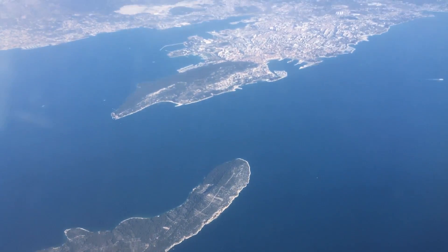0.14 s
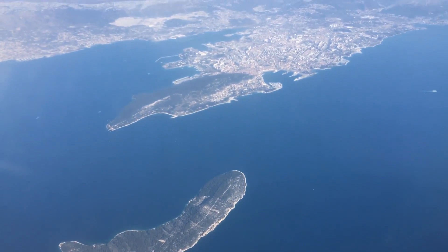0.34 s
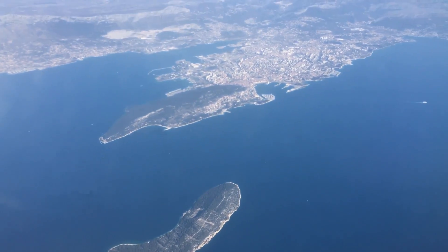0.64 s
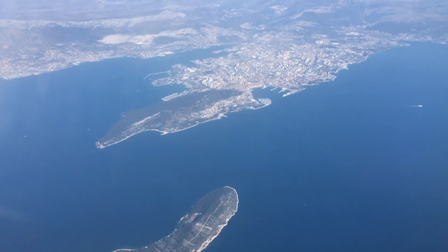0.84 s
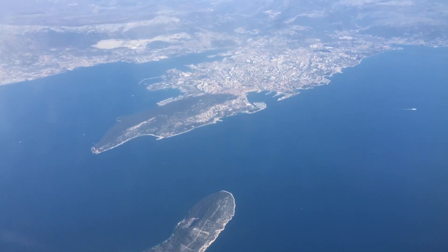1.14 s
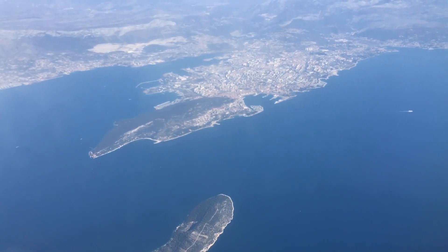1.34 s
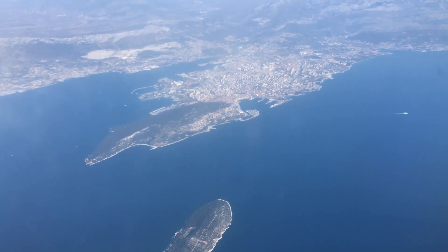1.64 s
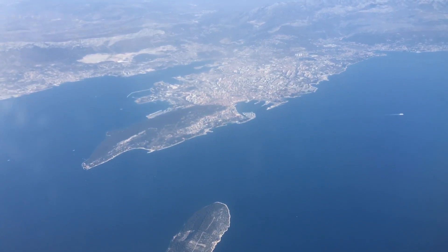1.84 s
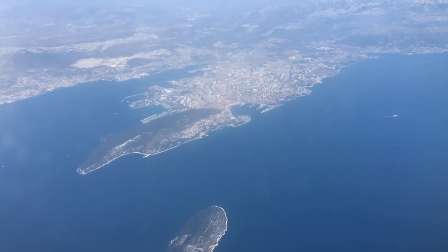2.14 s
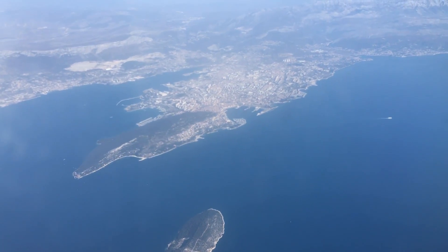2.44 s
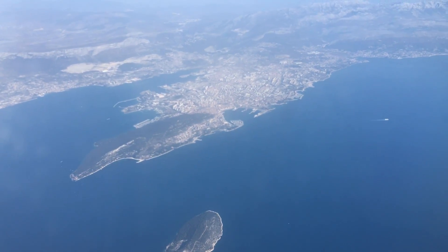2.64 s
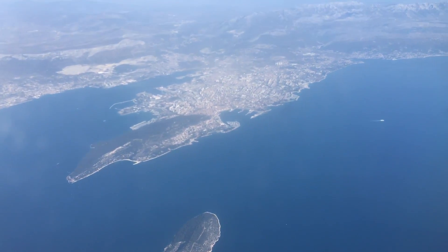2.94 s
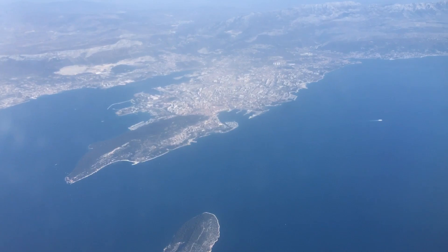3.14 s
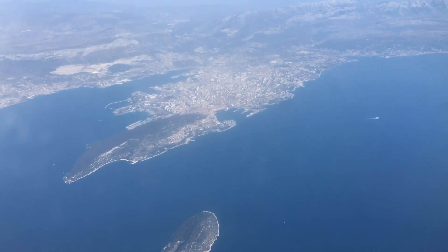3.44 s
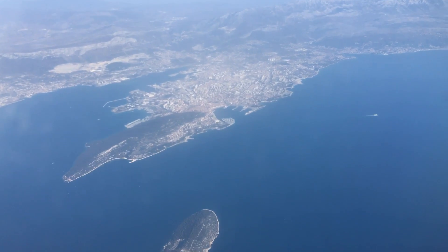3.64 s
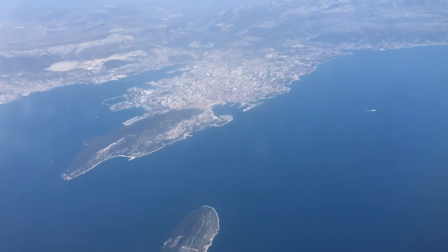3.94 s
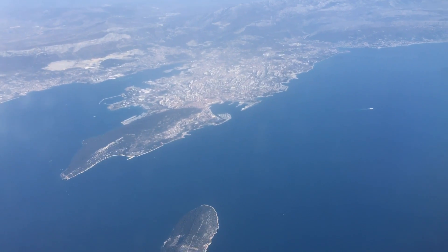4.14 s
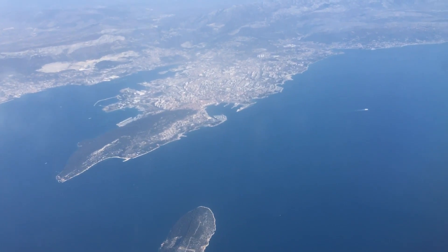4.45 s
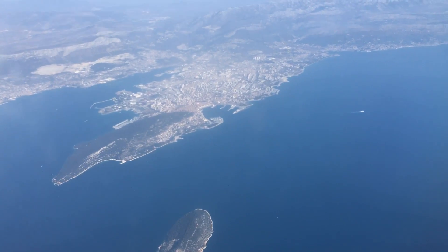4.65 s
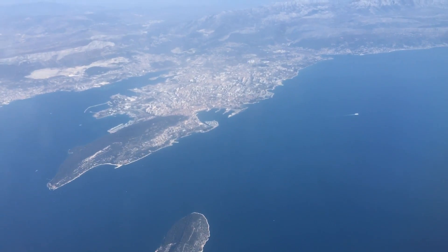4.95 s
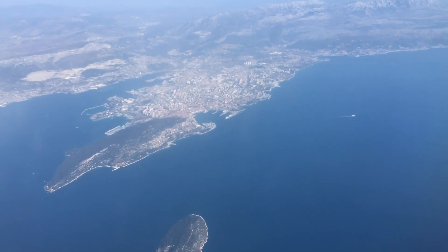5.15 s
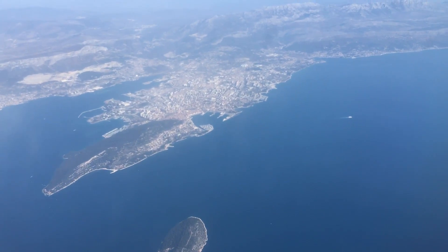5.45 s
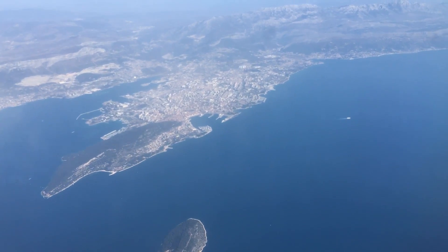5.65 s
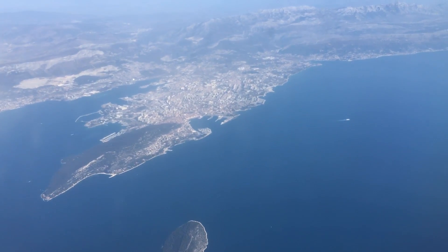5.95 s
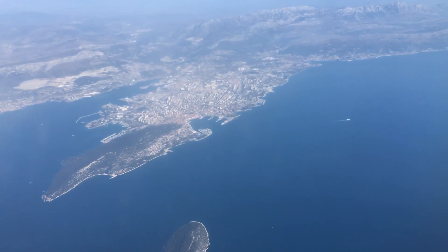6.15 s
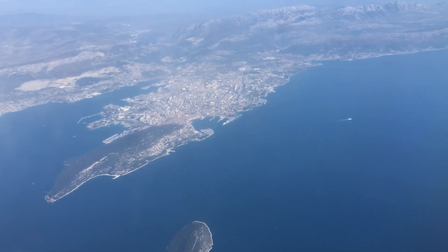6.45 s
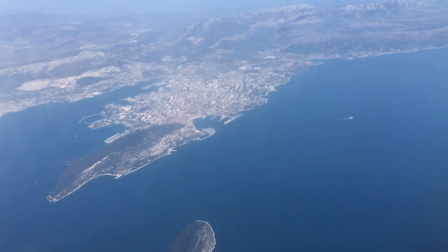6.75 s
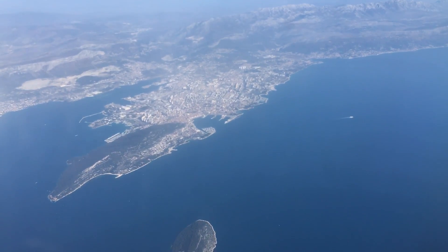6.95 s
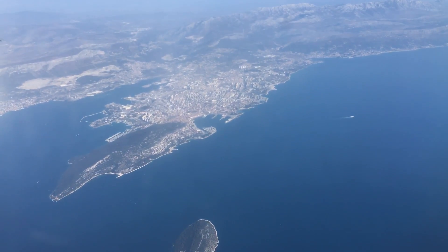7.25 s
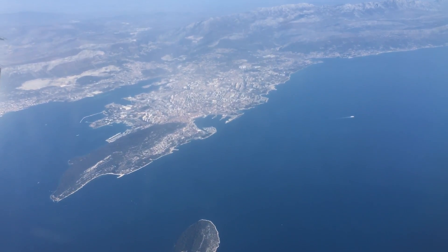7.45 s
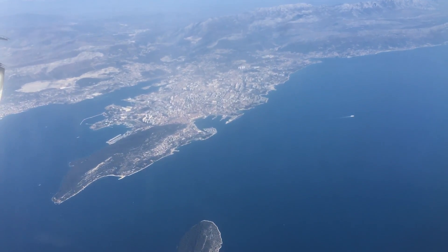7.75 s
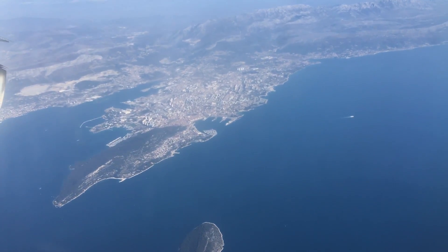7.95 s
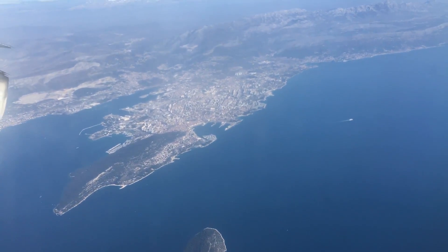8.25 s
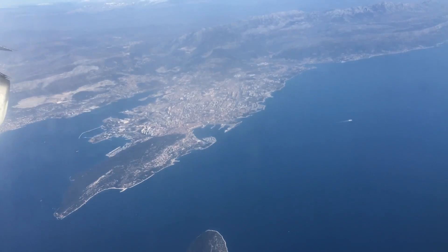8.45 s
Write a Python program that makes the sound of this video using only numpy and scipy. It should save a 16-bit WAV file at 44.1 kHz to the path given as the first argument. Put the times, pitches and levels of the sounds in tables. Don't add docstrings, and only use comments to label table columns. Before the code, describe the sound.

Steady low drone of two propellers beating slowly against each other, wrapped in dull cabin air rush, with faint plastic ticks near six seconds.

```python
import sys
import numpy as np
from scipy import signal
from scipy.io import wavfile
from scipy.ndimage import uniform_filter1d

SR = 44100
rng = np.random.default_rng(int(sys.argv[2]) if len(sys.argv) > 2 else 0)


def gain_from_db(level_db):
    decades = np.asarray(level_db, float) / 20
    return 10 ** decades


def materialize(psi):
    bounded = np.clip(np.atleast_2d(psi).T, -1, 1)
    quanta = np.round(bounded * 32767).astype(np.int16)
    wavfile.write(sys.argv[1], SR, quanta)


N = 379701


def evened(x):
    return x / np.sqrt(np.mean(x ** 2) + 1e-20)


# start in seconds, length in seconds, swing in degrees of a blade cycle.
SWINGS = [
    (0.15, 3.91, 160),
    (4.36, 3.83, 131),
]


def slip_deg(t, rest_deg=-174, skew=.94, roundness=1.77):
    slip = rest_deg
    for start, length, swing in SWINGS:
        progress = np.clip((t - start) / length, 0, 1)
        slip = slip + swing * abs(np.sin(np.pi * progress ** skew)) ** roundness
    return slip


# level of the steady propeller in dB, level of the hunting propeller in dB.
BLADE_HARMONICS = [(-14.5, -16.5), (-50, -23.5), (-42.5, -57.5), (-53, -58.5), (-59, -57.5), (-71, -58.5),
                   (-71, -70.5), (-69, -83.5)]


def propellers(blade_hz=89.978):
    t = np.arange(N) / SR
    slip = np.radians(slip_deg(t))
    steady = 2 * np.pi * blade_hz * t
    tones = np.zeros(N)
    for k, (steady_db, hunting_db) in enumerate(BLADE_HARMONICS, 1):
        tones += gain_from_db(steady_db) * np.cos(k * steady)
        tones += gain_from_db(hunting_db) * np.cos(k * (steady + slip))
    return np.sqrt(2) * tones


def fan(start_hz=51.0, rise_hz_per_s=.42, level_db=-29, swell_db=2.5):
    t = np.arange(N) / SR
    level = gain_from_db(level_db + swell_db * (t / t[-1]) ** 6)
    phase = 2 * np.pi * (start_hz + rise_hz_per_s * t / 2) * t
    return np.sqrt(2) * level * np.cos(phase)


# frequency in Hz, density in dB per Hz.
HULL = [(20, -52), (44, -47), (80, -32), (160, -35), (300, -45.5), (500, -54.5), (750, -59), (1100, -62),
        (2000, -67.5), (3100, -77.5), (4900, -89), (7700, -90), (10400, -94), (15500, -97)]
# centre in Hz, width in Hz, density at the top in dB per Hz.
PANELS = [(58, 12, -27.5), (70.5, 9.8, -28), (106.9, 13, -28), (121.9, 26.3, -28.5), (193.5, 39, -31.5),
          (244, 44, -37), (342.4, 55, -36), (382, 34, -32), (423.4, 45, -39), (539.5, 21, -47.5),
          (601.5, 100, -51), (878, 50, -56), (960, 36, -65.5), (1355, 153, -55.5), (1389, 45, -52.5),
          (1500, 160, -58.5), (1604, 50, -56), (1763, 220, -65), (2250, 340, -73.5), (2760, 140, -79),
          (3487, 130, -74), (3850, 1900, -85.5), (4380, 70, -83), (4670, 78, -81.5), (5400, 600, -88.5),
          (6370, 1300, -86.5), (7170, 300, -87.5), (9450, 1100, -92), (11100, 570, -91.5),
          (13000, 3200, -95.5)]
# centre in Hz, level facing away in dB, gain facing the window in dB.
FACING_BANDS = [
    (3300, -0.8, 3.5),
    (6200, 0.3, -0.7),
]


def hull_power(hz):
    f, db = np.transpose(HULL)
    power = gain_from_db(np.interp(np.log(hz + 1), np.log(f), db)) ** 2
    for centre, width, top_db in PANELS:
        power = power + gain_from_db(top_db) ** 2 / (1 + (2 * (hz - centre) / width) ** 4) ** 2
    return power


def window_hiss_db(hz, t, turn_s=3, turn_width_s=2.2, drift_db_per_s=-0.09):
    facing = np.exp(-((t - turn_s) / turn_width_s) ** 2)
    change_db = 0
    for centre_hz, away_db, gain_db in FACING_BANDS:
        band = np.exp(-(np.log((hz + 1) / centre_hz) / 0.23) ** 2)
        level_db = away_db + gain_db * facing + drift_db_per_s * (t - turn_s)
        change_db = change_db + np.outer(band, level_db)
    return change_db


def airflow(level_db=-12, patchy_db=1.16, swell_db=0.15, ripple_db=1.8, turning_db=-0.4,
            corner_hz=2000, smooth_hz=9000, hiss_db=0.5):
    size = 8192
    hop = size // 4
    frames = N // hop + size // 512
    hz = np.fft.rfftfreq(size, 1 / SR)
    power = hull_power(hz)
    a, b, patches, turning = rng.standard_normal((frames, len(hz), 4)).T
    patches = uniform_filter1d(patches, size=40, axis=0)
    patches = evened(uniform_filter1d(patches, size=8, axis=1))
    swell = evened(uniform_filter1d(rng.standard_normal(frames), size=6))
    treble = (hz ** 2 / (hz ** 2 + corner_hz ** 2) / (1 + (hz / smooth_hz) ** 4))[:, None]
    ripple = evened(uniform_filter1d(rng.standard_normal(len(hz)), size=8))[:, None]
    turning = uniform_filter1d(turning, size=90, axis=0)
    turning = evened(uniform_filter1d(turning, size=30, axis=1))
    gusty_hiss = (hz / (hz + smooth_hz))[:, None] * rng.standard_normal(frames)
    field_db = patchy_db * patches + swell_db * swell
    field_db = field_db + treble * (ripple_db * ripple + turning_db * turning)
    field_db = field_db + hiss_db * gusty_hiss
    t = np.arange(frames) * hop / SR - size / SR
    field_db = field_db + window_hiss_db(hz, t)
    z = (a + 1j * b) * np.sqrt(power)[:, None] * gain_from_db(field_db)
    noise = signal.istft(z, nperseg=size, noverlap=size * 3 // 4)[1]
    noise = evened(noise[size:size + N])
    return noise * gain_from_db(level_db) * np.sqrt(power.sum() * hz[1])


def resonate(x, hz, width):
    turn = np.exp(2j * np.pi * np.cumsum(hz) / SR)
    r = np.exp(-np.pi * width / SR)
    return 2 * (turn * signal.lfilter([1 - r], [1, -r], x / turn)).real


# start in seconds, end in seconds, pitch in Hz, level in dB, width in Hz.
WHISTLES = [(1.3, 5.4, 8590, -70, 220), (4.9, 7.1, 8590, -73.5, 220), (8.0, 9.2, 8700, -69.5, 240),
            (-.6, 1.2, 11640, -74, 300), (3.7, 8.6, 11730, -75, 320), (7.2, 8.45, 11700, -75.5, 300)]


def vents(flutter_db=1.0, fade_s=.45, waver_hz=18):
    t, out = np.arange(N) / SR, np.zeros(N)
    draws = rng.standard_normal((len(WHISTLES), 3, N))
    for (start, end, hz, db, width), (air, gusts, drift) in zip(WHISTLES, draws):
        air = air * gain_from_db(flutter_db * evened(uniform_filter1d(gusts, size=5000)))
        drift = uniform_filter1d(drift, size=20000)
        pitch = hz + waver_hz * evened(uniform_filter1d(drift, size=20000))
        heard = np.clip(np.minimum(t - start, end - t) / fade_s, 0, 1)
        whistle = resonate(resonate(air, pitch, width), pitch, width)
        out += gain_from_db(db) * heard * evened(whistle)
    return out


def add(mix, s, sound):
    part = mix[round(s * SR):][:len(sound)]
    part += sound[:len(part)]


# time in seconds, peak in dB, low ring against the snap in dB, low edge of the snap in Hz.
TICKS = [
    (5.7335, -49, -12, 7500),
    (6.075, -39.5, -2, 6000),
    (6.163, -42, -14, 10400),
]
# pitch in Hz, level in dB, time to fall 60 dB in seconds.
TRIM_RINGS = [
    (4430, 1.5, .012),
    (12300, -2.5, .009),
]


def trim(snap_t60=.014, rise_s=.0006):
    out, t = np.zeros(N), np.arange(800) / SR
    low, high = (gain_from_db(db - 60 * t / t60) * np.sin(2 * np.pi * hz * t) for hz, db, t60 in TRIM_RINGS)
    noises = rng.standard_normal((len(TICKS), len(t)))
    for (s, db, low_db, edge_hz), noise in zip(TICKS, noises):
        highpass = signal.butter(N=3, Wn=edge_hz, btype="high", fs=SR)
        snap = evened(signal.lfilter(*highpass, noise))
        tick = snap * gain_from_db(-60 * t / snap_t60) + gain_from_db(low_db) * low + high
        add(out, s, gain_from_db(db) * tick * (1 - np.exp(-t / rise_s)))
    return out


def scene():
    return (propellers() + fan() + airflow() + vents() + trim())[None]


def low_pass(x):
    return signal.sosfilt(signal.butter(12, 15780, fs=SR, output="sos"), x)


def record(dry, target_db=-12.5, strength=0.83, lag_s=0.54, start_db=-15.5):
    power = uniform_filter1d(dry[0] ** 2, size=SR // 3, mode="nearest")
    power_db = 10 * np.log10(power + 1e-9)
    r = np.exp(-1 / (lag_s * SR))
    heard_db = signal.lfilter([1 - r], [1, -r], power_db, zi=[r * start_db])[0]
    levelled = dry * gain_from_db(strength * (target_db - heard_db))
    edges = signal.windows.tukey(N, .004 * SR / N)
    held = np.clip(levelled, -.98, .98) * edges
    return low_pass(held)


dry = scene()
out = record(dry)
materialize(out)
```